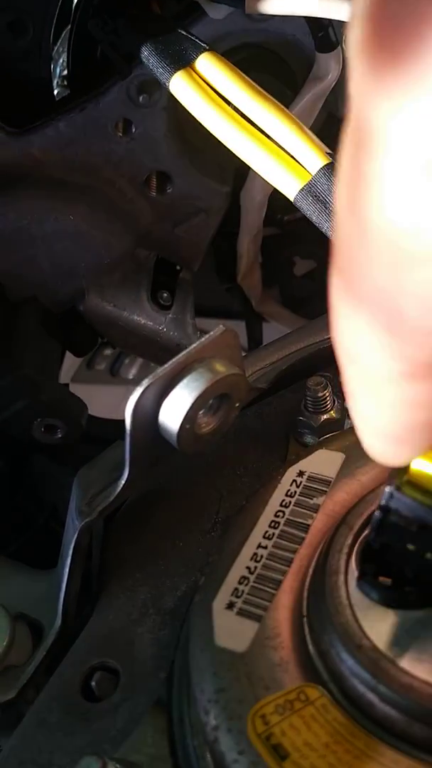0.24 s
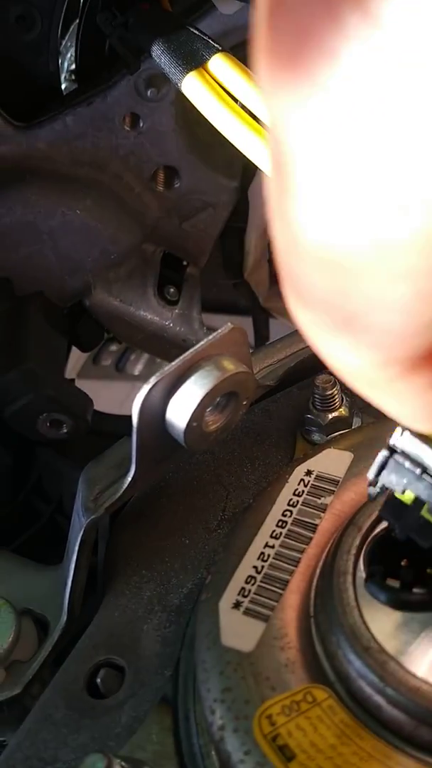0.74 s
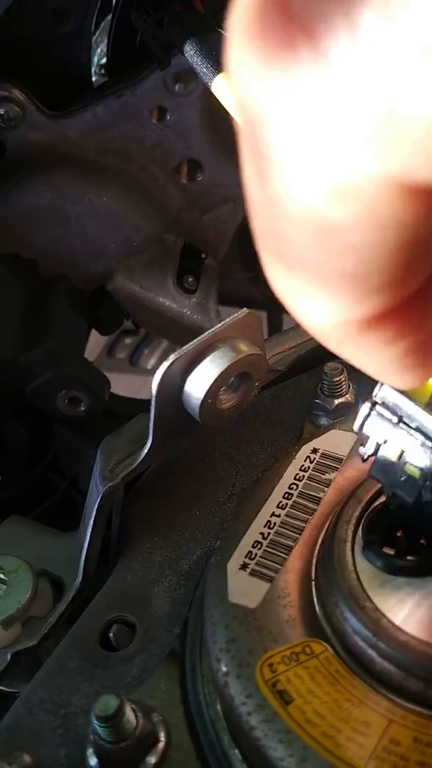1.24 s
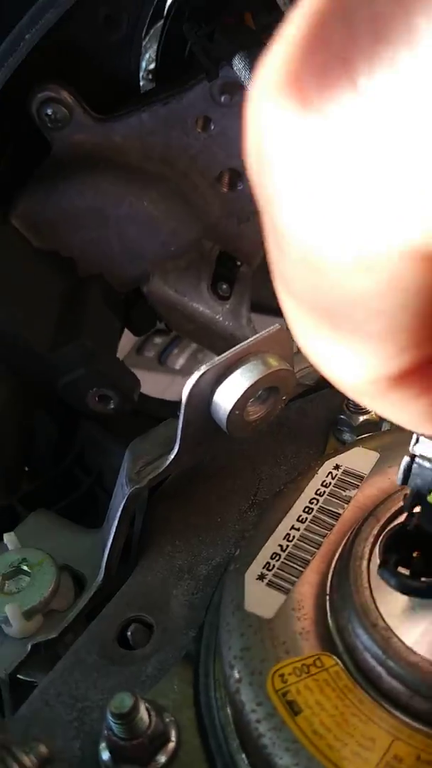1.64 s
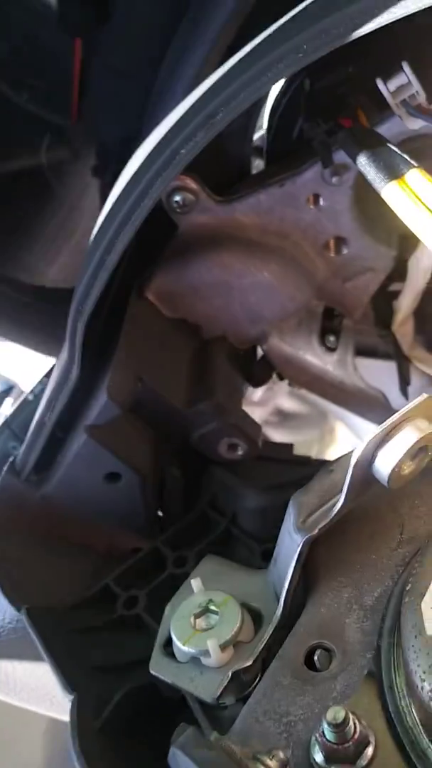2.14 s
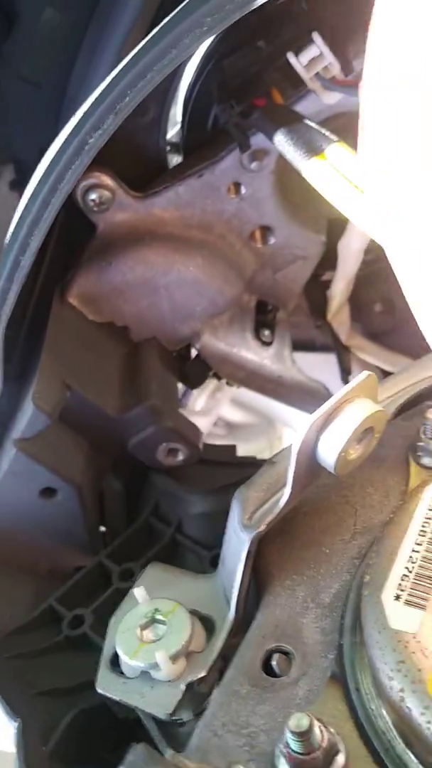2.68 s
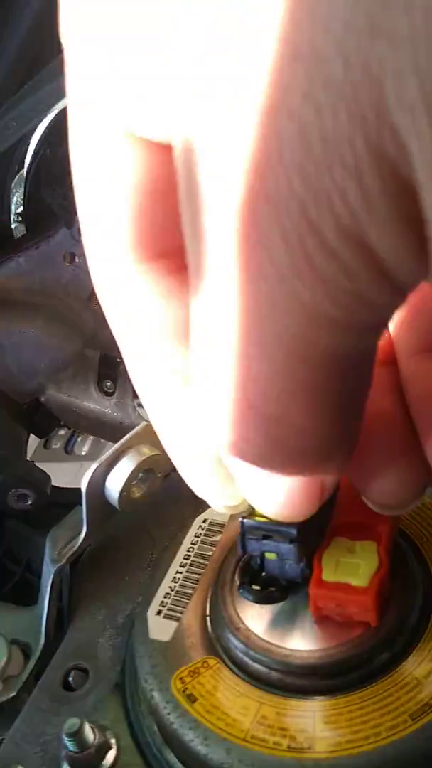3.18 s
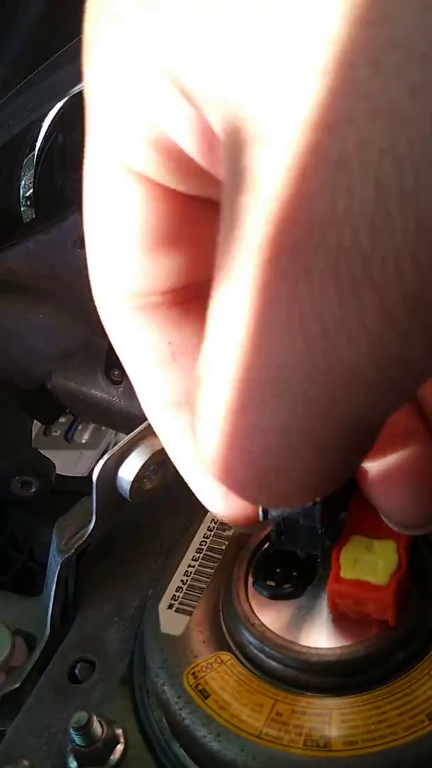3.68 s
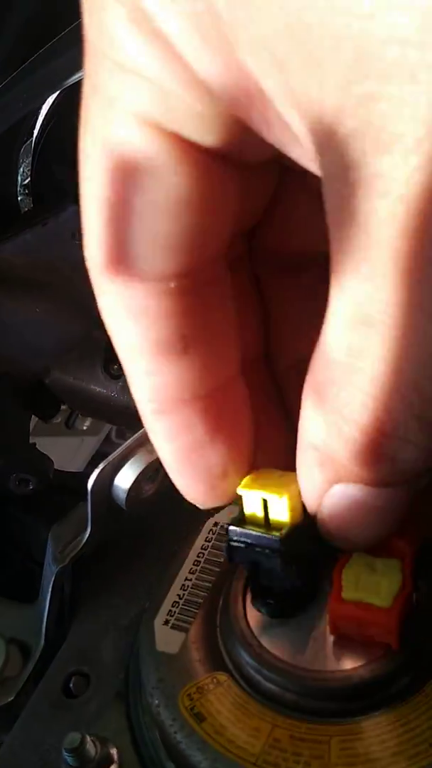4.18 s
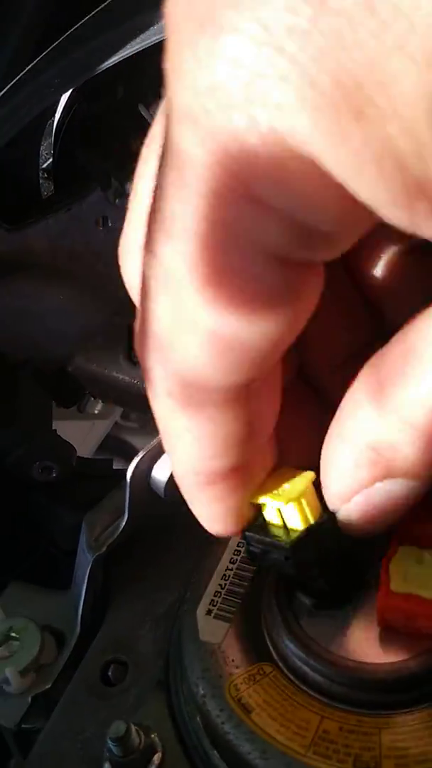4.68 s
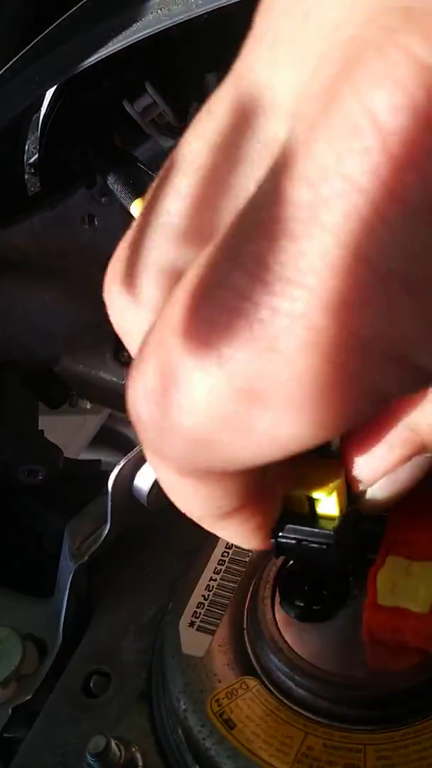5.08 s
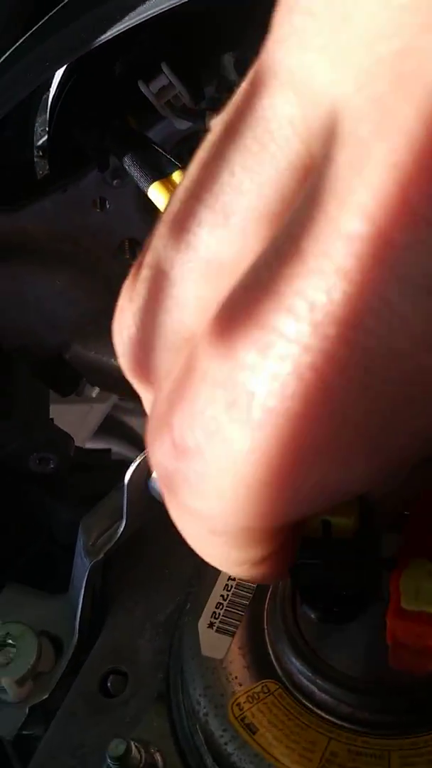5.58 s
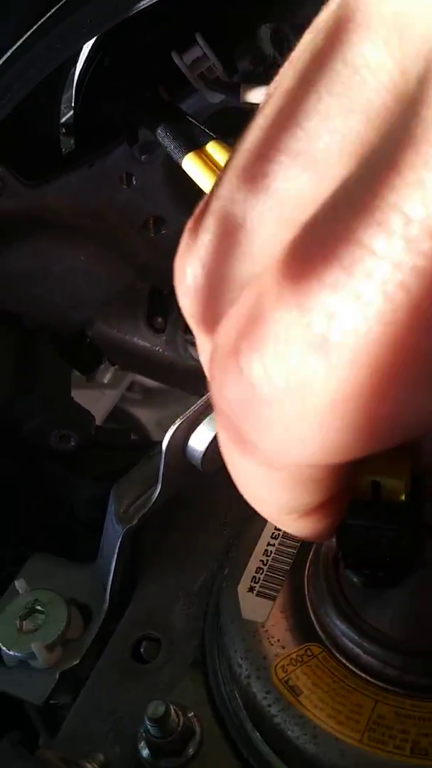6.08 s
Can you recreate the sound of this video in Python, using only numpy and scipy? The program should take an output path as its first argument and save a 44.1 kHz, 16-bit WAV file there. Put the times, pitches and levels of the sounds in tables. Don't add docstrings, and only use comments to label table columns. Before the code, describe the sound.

Fingers work small plastic plugs into sockets in a parked car: dry ticks, sharp bright snaps, a brief sleeve rub, faint outdoor air behind.

```python
import sys
import numpy as np
from scipy import signal
from scipy.fft import rfft, irfft, next_fast_len
from scipy.io import wavfile

SR = 44100
rng = np.random.default_rng(int(sys.argv[2]) if len(sys.argv) > 2 else 0)


def materialize(psi):
    bounded = np.clip(np.atleast_2d(psi).T, -1, 1)
    quanta = np.round(bounded * 32767).astype(np.int16)
    wavfile.write(sys.argv[1], SR, quanta)


def magnitude_from_level(level_db):
    exponent = np.asarray(level_db, float) / 20
    return 10 ** exponent


N = 279153
SPAN, LEAD = 6000, 800
TOP_HZ = 15760


# time in seconds, peak in dB, shell in dB, seated parts in dB, panel in dB.
SNAPS = [(0.0905, -35, -7, -16, -16), (0.7432, -38, -4, -28, -15), (0.7538, -32, -10.5, -28, -21.5),
         (2.0001, -35.5, -17, -22.5, -23), (2.1108, -26, -5.5, -22, -32), (2.12, -29.5, -12, -14.5, -30),
         (2.4066, -29.5, -23, -7, -22), (2.5182, -31.5, -11, -16.5, -15.5),
         (2.8789, -33.5, -10.5, -25, -23), (2.9796, -39.5, -14, -21, -20),
         (3.4209, -18, -11.5, -33.5, -30.5), (3.7832, -35.5, -31, -32, -21.5),
         (4.061, -15, -17, -34, -27.5), (4.0682, -13, -14.5, -23, -23.5), (4.2831, -24, -17, -27, -31),
         (4.728, -24.5, -18, -26.5, -28), (5.1978, -37, -9, -29, -22)]


def latch_snaps():
    out = np.zeros(N + SPAN)
    for time_s, peak_db, shell_db, seated_db, panel_db in SNAPS:
        snap = contact(shell_db + 4.5, seated_db + 7, seated_db + 5, panel_db + 0.5,
                       creep_ms=0.74, chatter_ms=3.02)
        start = round(time_s * SR) - LEAD
        out[start:start + SPAN] += magnitude_from_level(peak_db) * snap
    return out[:N]


# time in seconds, peak in dB, body in dB, chatter in ms.
TICKS = [(0.13, -35.5, -15, 4.7), (0.2237, -32, -19.5, 4.2), (0.412, -42.5, -7, 4.9),
         (0.4623, -45.5, -11, 4.0), (0.817, -44, -16, 4.0), (0.9863, -47, -11, 4.0),
         (1.1644, -46, -25, 3.3), (1.593, -40, -14, 3.5), (1.942, -44.5, -14, 4.0), (2.0825, -40, -12, 17),
         (2.1017, -21.5, -22.5, 17.9), (2.2, -35, -9, 5.3), (2.2336, -38, -10, 8), (2.573, -36.5, -18, 4.7),
         (3.0893, -34, -18, 4.05), (3.3134, -46, -23, 4.5), (3.5164, -48, -30, 4.0),
         (3.554, -45.5, -18, 4.4), (3.7247, -41.5, -27, 8), (3.7698, -38, -27, 4.4),
         (3.9923, -37.5, -18.5, 9.5), (4.163, -40, -19.5, 1.2), (4.2129, -39.5, -23, 12),
         (4.297, -43, -13, 2.7), (4.4689, -44, -23, 7.7), (4.738, -40, -19, 4.2), (4.8914, -41.5, -16, 2.4),
         (5.117, -48, -22, 4.3), (6.1452, -46, -11, 4.0)]


def plastic_ticks():
    out = np.zeros(N + SPAN)
    for time_s, peak_db, body_db, chatter_ms in TICKS:
        tick = contact(-9, body_db + 3.5, body_db - 0.5, body_db + 2.5, creep_ms=2.3, chatter_ms=chatter_ms)
        start = round(time_s * SR) - LEAD
        out[start:start + SPAN] += magnitude_from_level(peak_db - 6.5) * tick
    return out[:N]


# pitch in Hz, level in dB, decay time t60 in seconds.
LATCH = [(7040, -3, 0.0059), (7770, 1, 0.0042), (8430, 3.5, 0.0061), (9090, 1, 0.01), (10170, -2, 0.0063),
         (11130, -5, 0.0041), (12630, -2.5, .003), (13940, 2, 0.0012), (14500, -9, 0.0039)]
SHELL = [(5360, -9.5, 0.00086), (6100, -3.5, 0.0042), (5970, 3.5, 0.0035), (7137, 1, 0.0054)]
TONGUE = [(2650, -1, 0.0028), (3240, -3, 0.0091), (4090, 1, 0.0039), (4220, 2, 0.0057), (4610, 3.5, 0.0016)]
HOUSING = [(1430, 0.5, 0.011), (1590, 1.5, 0.02), (1930, 0.5, 0.013)]
PANEL = [(355, -16.5, 0.15), (531, -3.5, 0.098), (727, 5, 0.014), (882, -12.5, 0.059), (1122, -3.5, 0.077)]


def contact(shell_db, tongue_db, housing_db, panel_db, creep_ms, chatter_ms):
    ms = (np.arange(SPAN) - LEAD) * 1000 / SR
    creep = 1.2 * np.exp(-np.abs(ms) / creep_ms) + 0.092 * np.exp(-(ms / 7.8) ** 2)
    chatter = np.exp(-(ms / chatter_ms) ** 2)
    rattle = 0.17 * np.exp(-(ms / 11) ** 2) + 0.04 * np.exp(-np.abs(ms) / 12)
    swell = np.where(ms < 0, creep, chatter + rattle)
    slips = swell * rng.standard_normal(SPAN) * magnitude_from_level(3.16 * rng.exponential(1, SPAN))
    first_blow = slips * (1.1 + np.exp(-np.abs(ms) / 2))
    out = body(slips, LATCH)
    out += magnitude_from_level(shell_db) * body(slips, SHELL)
    out += magnitude_from_level(tongue_db) * body(slips, TONGUE)
    out += magnitude_from_level(housing_db) * body(first_blow, HOUSING)
    out += magnitude_from_level(panel_db) * body(first_blow, PANEL)
    return out


def body(slips, modes):
    out = np.zeros(len(slips))
    sign = 1
    for hz, level_db, t60_s in modes:
        strength_db, detune = 2 * rng.standard_normal(), 0.014 * rng.standard_normal()
        out += sign * magnitude_from_level(level_db + strength_db) * ring(slips, hz * (1 + detune), t60_s)
        sign = -sign
    return out / np.abs(out).max()


def ring(x, hz, t60_s):
    decay, turn = magnitude_from_level(-60 / (t60_s * SR)), 2 * np.pi * hz / SR
    return signal.lfilter([0, np.sin(turn)], [1, -2 * decay * np.cos(turn), decay ** 2], x)


# time in seconds, peak in dB, pitch in Hz, decay t60 in seconds.
KNOCKS = [(1.381, -52, 3000, 0.014), (1.382, -51, 2000, 0.01), (1.643, -55, 1600, .012),
          (1.644, -52, 610, 0.028), (2.121, -35, 170, 0.037), (2.211, -29.5, 318, 0.0072),
          (2.245, -37, 320, 0.024), (2.4066, -31.5, 920, 0.022), (2.407, -40, 4400, 0.013),
          (2.4076, -28.5, 1130, 0.0083), (2.5185, -38.5, 535, 0.032), (2.5194, -34.5, 760, 0.017),
          (4.061, -38.5, 528, 0.069), (4.068, -39.5, 700, 0.028), (4.0615, -23, 7400, 0.0086),
          (4.060, -21, 1780, 0.0032), (4.0684, -24.5, 1600, 0.012), (4.0679, -33.5, 1138, 0.063),
          (4.730, -33, 4970, 0.018), (4.7295, -29.5, 6400, 0.014), (3.4215, -41, 4600, 0.0074),
          (4.0685, -27.5, 2300, 0.0048), (5.198, -37.5, 8000, 0.01), (5.286, -49, 220, 0.045)]


def trim_knocks():
    out = np.zeros(N)
    for time_s, peak_db, hz, t60_s in KNOCKS:
        blow = np.full(N, 1e-18)
        blow[round(time_s * SR)] = magnitude_from_level(peak_db)
        out += ring(blow, hz, t60_s)
    return out


# frequency in Hz, level in dB per Hz.
RUB_BRIGHT = [(5500, -15), (6400, -27), (7410, -9.5), (8610, 4.5), (9820, -2), (11300, -2), (13000, -11),
              (15700, -13)]
RUB_MIDDLE = [(900, -15), (1500, -3), (3000, -0.5), (4600, -0.5), (5600, 0), (6300, -7.5), (7200, -3)]
RUB_LOW = [(100, -12), (200, 4), (345, 7.5), (700, 7), (1200, -0.5), (2000, -4.5)]
# start in seconds, length in seconds, speed in dB, pressure in dB,
# hollow of the trim in Hz.
STROKES = [
    (2.126, 0.36, -55.5, -1, 3150),
    (2.408, 0.27, -56.5, -10.5, 2990),
    (2.596, 0.38, -63.5, -11, 3030),
    (2.828, .405, -58.5, -11.5, 4220),
    (2.881, .3, -62, -7.5, 4980),
]


def sleeve():
    t, out = np.arange(N) / SR, np.zeros(N)
    catches = magnitude_from_level(0.39 * drift(50) + 0.91 * drift(400))
    for start_s, length_s, speed_db, pressure_db, hollow_hz in STROKES:
        swell = (t - start_s) / 0.096
        stop = (start_s + length_s - t) / 0.076
        moving = np.clip(np.minimum(swell, stop), 0, 1)
        remaining = np.clip(1 - (t - start_s) / length_s, 0, 1)
        pitch = hollow_hz * (1 - 0.17 * magnitude_from_level(pressure_db) * remaining)
        wander = drift(100) + 1j * drift(100)
        hollow = np.real(wander * np.exp(2j * np.pi * np.cumsum(pitch) / SR))
        rub = magnitude_from_level(1.3) * coloured(RUB_BRIGHT)
        rub += magnitude_from_level(pressure_db - 2) * coloured(RUB_MIDDLE)
        rub += magnitude_from_level(0.65 * pressure_db - 6) * hollow
        rub += magnitude_from_level(0.43 * pressure_db - 2.5) * coloured(RUB_LOW)
        out += magnitude_from_level(speed_db) * moving * rub
    return catches * out


def rms_one(x):
    return x / np.sqrt(np.mean(x ** 2) + 1e-20)


def coloured(spectrum):
    hz, level_db = np.transpose(spectrum)
    size = next_fast_len(N)
    log_hz = np.log(np.arange(size // 2 + 1) * SR / size + 1)
    gain = magnitude_from_level(np.interp(log_hz, np.log(hz), level_db, right=-60))
    return rms_one(irfft(rfft(rng.standard_normal(size)) * gain, size)[:N])


def drift(rate_hz):
    r = np.exp(-2 * np.pi * rate_hz / SR)
    wander = signal.lfilter([1], [1, -2 * r, r * r], rng.standard_normal(N + SR))
    return rms_one(wander[SR:])


# start in seconds, length in seconds, first pitch in Hz, last pitch in Hz, level in dB.
CHIRPS = [
    (1.597, .055, 3200, 2300, -68),
    (1.777, .055, 3250, 2200, -66),
    (1.96, .05, 3300, 2300, -65),
    (4.59, .13, 4500, 4800, -73),
    (5.56, .13, 2700, 2750, -75),
]


def birds():
    out = np.zeros(N)
    husk = 0.5 + drift(260) + 1j * drift(260)
    for start_s, length_s, first_hz, last_hz, level_db in CHIRPS:
        progress = np.arange(round(length_s * SR)) / (length_s * SR)
        phase = 2 * np.pi * np.cumsum(first_hz + (last_hz - first_hz) * progress) / SR
        start = round(start_s * SR)
        span = slice(start, start + len(progress))
        out[span] += magnitude_from_level(level_db) * np.sin(np.pi * progress) * np.real(husk[span] * np.exp(1j * phase))
    return out + magnitude_from_level(-3) * np.roll(out, round(0.019 * SR))


# nearest moment in seconds, level in dB.
PASSES = [
    (2.3, -61),
    (4.25, -68.5),
    (6.0, -63),
]


def traffic():
    t = np.arange(N) / SR
    passing = np.zeros(N)
    for nearest_s, level_db in PASSES:
        passing += magnitude_from_level(level_db) / (1 + ((t - nearest_s) / 0.23) ** 2)
    rumble = coloured([(50, -39), (95, 4.5), (150, -11), (190, 9), (240, 0), (400, -69)])
    engine_hz = 150
    engine = np.real((drift(3.9) + 1j * drift(6.6)) * np.exp(2j * np.pi * engine_hz * t))
    road = (magnitude_from_level(-65.5) + passing) * magnitude_from_level(-8.5 + 2 * drift(3.7)) * rumble
    return road + magnitude_from_level(-8) * passing * engine


def breeze():
    level_db = -69 - 0.88 * np.arange(N) / SR
    return magnitude_from_level(level_db) * coloured([(500, -16), (1100, 3.5), (3000, -5.5), (5500, -5), (7000, -11)])


# frequency in Hz, level in dB per Hz.
AIR = [(25, -39), (45.5, -19.5), (105, -7), (240, -7.5), (573, -10.5), (615, -7), (985, -17.5), (5240, -22),
       (5700, -34), (6900, -27.5), (7800, -17), (8550, -10.5), (10240, -15.5), (9600, -22.5), (TOP_HZ, -25)]


def outdoor_air():
    return magnitude_from_level(-62.5 + 0.67 * drift(5.1)) * coloured(AIR)


def cabin(x):
    t60_s, level_db = 0.047, -11
    t = np.arange(SPAN) / SR
    tail = rng.standard_normal(SPAN) * magnitude_from_level(-60 * t / t60_s) * (t > 0.002)
    tail /= np.sqrt(np.sum(tail ** 2))
    return x + magnitude_from_level(level_db) * signal.fftconvolve(x, tail)[:N]


def scene():
    plugs = latch_snaps() + plastic_ticks() + trim_knocks()
    plugs = signal.sosfilt(signal.butter(4, 280, "high", fs=SR, output="sos"), plugs)
    mono = cabin(plugs + birds()) + sleeve() + traffic() + breeze() + outdoor_air()
    return np.array([mono, mono])


def top_cut(x):
    return signal.sosfilt(signal.butter(12, 16630, fs=SR, output="sos"), x)


def record(dry):
    low_pass = signal.ellip(12, 0.5, 70, 16500, fs=SR, output="sos")
    return top_cut(signal.sosfilt(low_pass, dry))


dry = scene()
out = record(dry)
materialize(out)
```